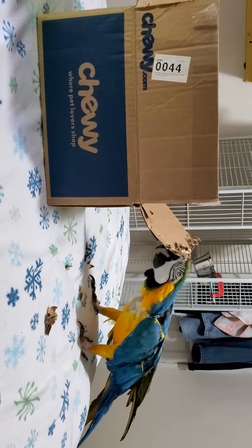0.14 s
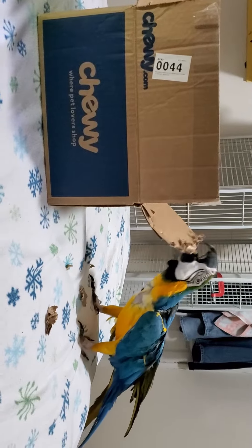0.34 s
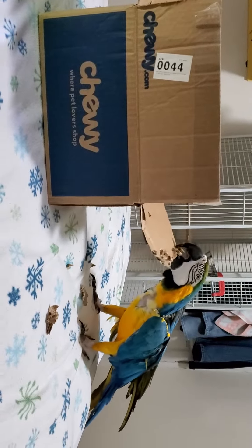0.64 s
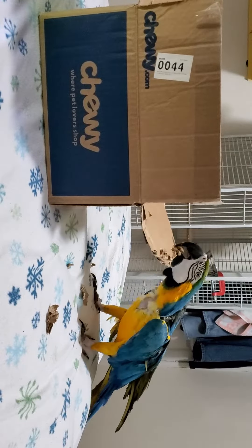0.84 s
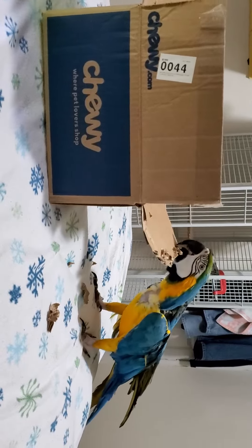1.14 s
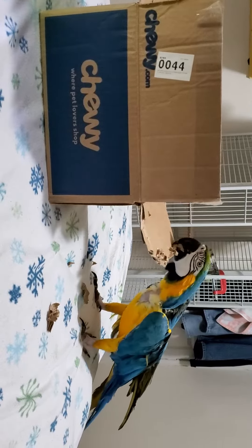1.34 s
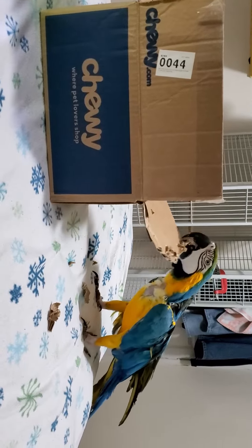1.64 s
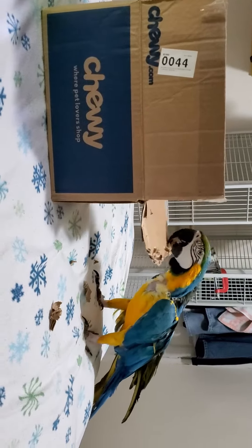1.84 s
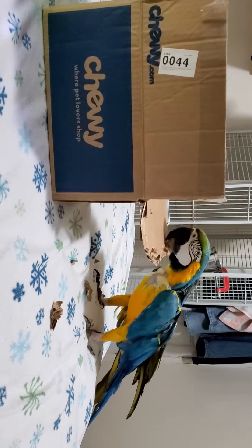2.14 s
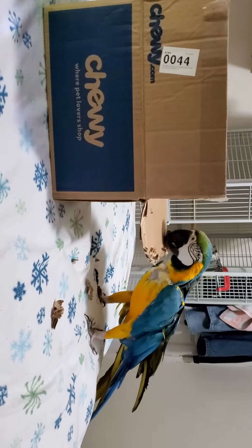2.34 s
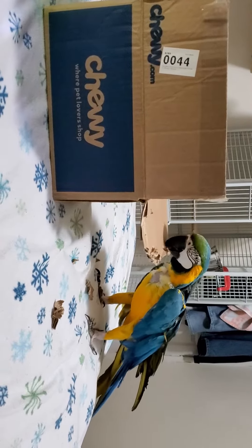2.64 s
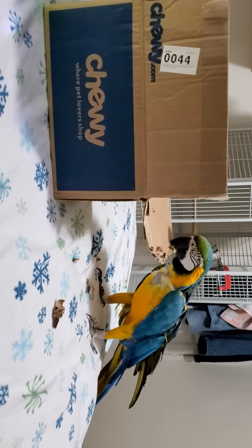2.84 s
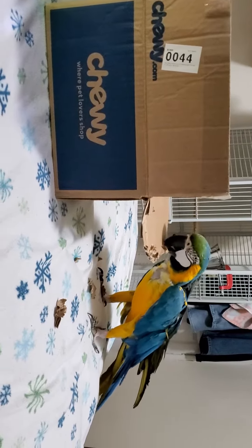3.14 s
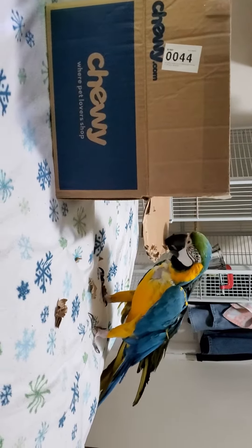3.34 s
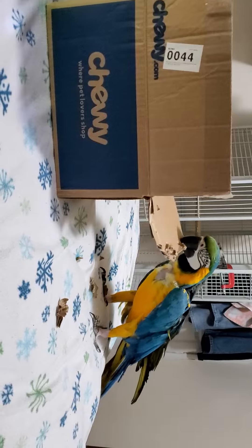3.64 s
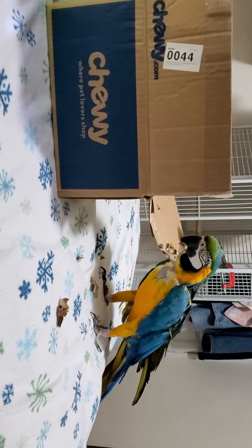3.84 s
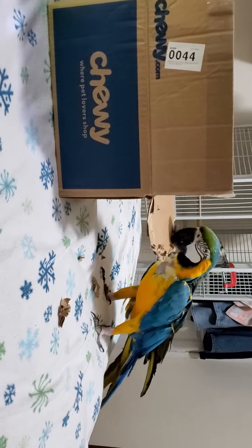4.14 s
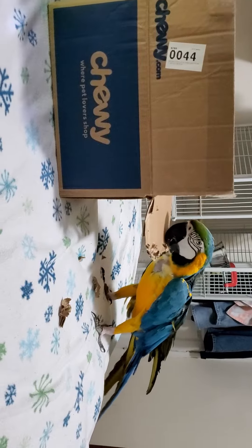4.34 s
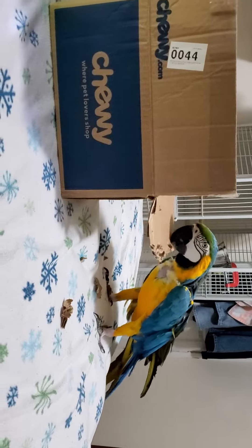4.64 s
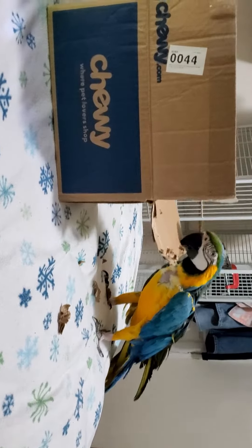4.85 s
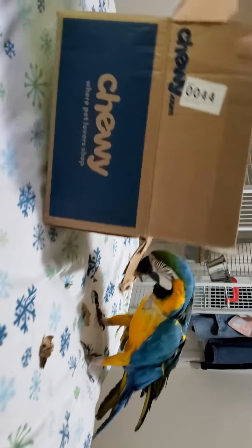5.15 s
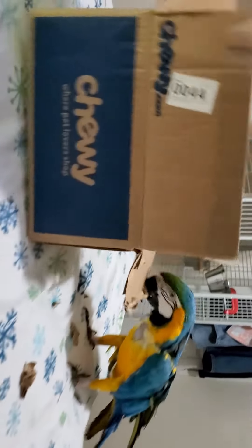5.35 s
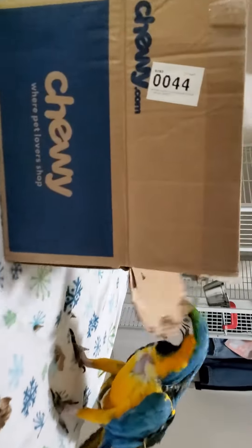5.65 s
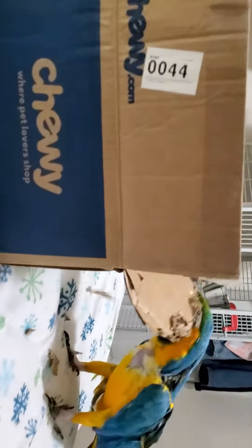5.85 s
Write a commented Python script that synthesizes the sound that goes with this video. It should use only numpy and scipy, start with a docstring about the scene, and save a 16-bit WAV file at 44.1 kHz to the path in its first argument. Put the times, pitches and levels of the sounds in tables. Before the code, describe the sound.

A quiet bedroom with a steady, low fan-like hum and soft airy rumble, picked up in stereo by a phone a metre or two from a large parrot chewing cardboard. At 0.2-0.3 s small tugs knock the hollow box, followed by faint nibbling and a knock at 0.7. A sharp, bright snap and rip lands at 1.05; fizzy, crackling tears run from 1.2 to 1.6, then a duller knock at 1.8. Around 2.0-2.15 a strong rip comes with loud boxy knocks and snaps. From 2.3 to 4.9 the chewing is lighter: scratchy scrapes, small crackles, knocks near 2.7 and 3.1, clicks at 3.6 and 4.4. At 5.05 the hardest tug thumps the box, with dense tearing and snaps until about 5.3. A very faint, wavering metallic ring lingers under the last small crackles until about 6 s. The room's tail is short and soft.

```python
"""A large parrot chews a cardboard flap a metre or two from a phone in a quiet bedroom.
A fan-like hum and air noise fill the soft room throughout: a wavering low tone and bands of noise.
Tugs soon knock the hollow box, ringing its modes; fibres then part in crackle, a dense stream of tiny
noise puffs swelling with each rip, and single fibres snap as very short noise bursts.
Near the end a jolt sets a thin metal ring going, a wavering sine that lingers."""
import sys
import numpy as np
from scipy import signal
from scipy.fft import rfft, irfft, next_fast_len
from scipy.io import wavfile
from scipy.ndimage import uniform_filter1d, map_coordinates

SR = 44100
rng = np.random.default_rng(int(sys.argv[2]) if len(sys.argv) > 2 else 0)


def to_wav(s):
    """Save 16-bit WAV."""
    ch = np.atleast_2d(s).T  # columns
    pcm = np.round(np.clip(ch, -1, 1) * 32767)  # PCM
    wavfile.write(sys.argv[1], SR, pcm.astype(np.int16))


N = 264688


def undb(db):
    """Decibels to an amplitude factor."""
    return 10 ** (np.asarray(db) / 20)


def level(x, db):
    """Scale a sound to an RMS level in dB."""
    return x * undb(db) / np.sqrt(np.mean(x ** 2))


def along(table, size):
    """Read a (frequency [Hz], value) table at every bin of a transform, on a log frequency axis."""
    hz, value = np.transpose(table)
    bins = np.fft.rfftfreq(size, 1 / SR)
    return np.interp(np.log(bins + 1), np.log(hz), value)


def colour(x, table):
    """Filter a sound by a (frequency [Hz], gain [dB]) curve without shifting phase."""
    size = next_fast_len(x.shape[-1])
    shaped = irfft(rfft(x, size) * undb(along(table, size)), size)
    return shaped[..., :x.shape[-1]]


def ports(a, b):
    """Two unrelated signals become the left and right microphone ports in a diffuse field."""
    # how alike the two ports hear the room: (frequency [Hz], left-right correlation)
    likeness = [(60, 0.98), (130, 0.93), (290, 0.49), (640, -0.5), (1410, -0.45), (3100, 0.17),
                (6820, -0.27), (15000, -0.31)]
    size = next_fast_len(len(a))
    correlation = np.clip(along(likeness, size), -.99, .995)
    mid = irfft(rfft(a, size) * np.sqrt((1 + correlation) / 2), size)
    side = irfft(rfft(b, size) * np.sqrt((1 - correlation) / 2), size)
    return np.array([mid + side, mid - side])[:, :len(a)]


def walk(rate):
    """Random levels, rate per second, smoothed by two moving averages; spread near 1."""
    hold = int(SR / rate)
    steps = np.repeat(rng.standard_normal(N // hold + 1), hold)
    smooth = uniform_filter1d(uniform_filter1d(steps, hold), hold)
    return 1.58 * smooth[:N]


def add(track, s, sound):
    """Mix a sound into a track at a time in seconds."""
    i = int(s * SR)
    track[..., i:i + sound.shape[-1]] += sound[..., :N - i]


def tearing():
    """One stream of fibre breaks is heard as hiss, fizz, scrape and through the flap's body."""
    # spectra of the four layers: (frequency [Hz], relative level per Hz [dB])
    hiss_shape = [(3000, -7.5), (4200, -1.5), (5200, 0), (6600, 3.5), (8500, 0), (11000, -22)]
    fizz_shape = [(8000, -34), (10000, -11), (12500, -3), (14500, -6.5), (16500, -2)]
    scrape_shape = [(1500, -5), (2100, -4.5), (2500, -7.5), (3000, -1.5), (3500, -7), (4600, -23)]
    body_shape = [(350, -3), (600, -7.5), (850, -3), (1050, -0.5), (1280, -3), (1450, -1), (1700, -18),
                  (2100, -33)]
    body_db, body_rest_db = -5, -69.5  # body re scrape; its murmur between bites
    hiss_gain, fizz_gain, scrape_gain = rips()
    body_gain = np.hypot(scrape_gain * undb(body_db), undb(body_rest_db))

    fibres = patchiness(ports(*crackle()))
    layers = level(colour(fibres, hiss_shape), 0) * hiss_gain
    layers += level(colour(fibres, fizz_shape), 0) * fizz_gain
    # scrape and body each flutter on their own, then all four together
    layers += level(colour(fibres, scrape_shape), 0) * scrape_gain * undb(1.5 * walk(60))
    layers += level(colour(fibres, body_shape), 0) * body_gain * undb(1.6 * walk(55))
    return undb(1.4 * walk(50)) * layers


def rips():
    """Every rip swells, holds and dies by one rule; overlapping rips add up as power."""
    # bites and rips: (full strength at [s], swell before [ms], hold [ms], hiss level [dB],
    # fizz re hiss [dB], scrape of the flap re hiss [dB])
    bites = [(.405, 8, 58, -67.5, 0, -9), (.545, 8, 30, -74, -6, -7), (.7, 23, 10, -65, -15, 0.5),
             (.9, 53, 103, -77.5, -9, 7.5), (1.047, 8.3, 6.6, -45.5, -6, -2.5),
             (1.22, 69, 8.4, -57, 6.5, -5.5), (1.3, 24, 12, -59, 11.5, 4.5), (1.39, 60, 22, -53.5, 7.5, -5),
             (1.469, 45, 56, -54, 6.5, -2), (1.558, 55, 28, -52, 7, -7), (1.74, 65, 8.1, -62.5, 2.5, -1),
             (1.81, 30, 52, -69.5, -4, 4.5), (1.93, 9.5, 6.9, -73, 0, -2), (1.975, 4.6, 15, -58, -8, -21),
             (2.069, 50, 36, -47, 0.5, -4), (2.152, 6, 4, -52, -7, -15), (2.3, 50, 30, -64, 2, -10),
             (2.45, 25, 18, -66, 0, 6), (2.539, 30, 12, -65.5, -3, 5.5), (2.65, 57, 29, -68.5, 3, 0),
             (2.739, 81, 51, -60, 7, 5.5), (2.868, 30, 85, -68.5, -2, 5.5), (3.071, 36, 78, -61.5, -4, 6),
             (3.312, 51, 54, -67, -18, 10.5), (3.42, 76, 180, -70.5, -9, 5.5),
             (3.61, 10, 18, -59.5, -8, -6), (3.7, 73, 29, -58, 6, 3), (3.84, 60, 23, -68.5, 3, -5),
             (4.04, 29, 42, -62, -7, 3), (4.14, 47, 16, -69, -6, 2.5), (4.249, 45, 8.5, -70, -3, 2.5),
             (4.31, 10, 93, -68, 4, 4), (4.44, 7.5, 17, -59, -2, 5), (4.64, 72, 18, -68, 0, 3),
             (4.72, 47, 114, -71.5, -13, 7), (4.931, 34, 95, -58.5, 9.5, -1.5), (5.054, 17, 42, -52, 3, 6),
             (5.17, 45, 106, -50, -2, -14), (5.252, 23, 71, -55, -13, 8), (5.43, 23, 110, -66, -6, -1),
             (5.609, 59, 23, -65, -1, -3.5), (5.73, 26, 6.6, -62, -6, 3.5), (5.8, 20, 200, -77, -2, 2.5)]
    swell_db, release_db_per_s = 12.5, 256  # gain over the swell; one rate of dying for all
    t = np.arange(N) / SR
    power = np.zeros((3, N))
    for s, swell_ms, hold_ms, hiss_db, fizz_db, scrape_db in bites:
        early = 1000 * (s - t) / swell_ms  # in swell lengths
        late = t - s - hold_ms / 1000
        slope_db = swell_db * np.maximum(early, 0) + release_db_per_s * np.maximum(late, 0)
        shape = undb(hiss_db - slope_db)
        power += (shape * undb([[0], [fizz_db], [scrape_db]])) ** 2
    return np.sqrt(power)


def crackle(rate=900., scatter_db=4.5, smear_s=.001, bed_db=4.0):
    """Tiny fibre breaks of uneven size, each a short noise puff over a steady bed."""
    struck = rng.random(N) < rate / SR  # rate is in breaks per second
    size_db = np.minimum(scatter_db * rng.exponential(size=N), 18.)
    puffs = signal.lfilter([1], [1, -np.exp(-1 / (smear_s * SR))], struck * undb(size_db))
    return (level(puffs, 0) + undb(bed_db)) * rng.standard_normal((2, N))


def patchiness(x, depth_db=3.5, hold_frames=3.0, hold_bins=1.5):
    """Random level patches, smooth over time and frequency, make the rustle's colour uneven and shifting."""
    z = signal.stft(x, nperseg=512)[2]
    grid = rng.standard_normal((260, 1100))
    rows, cols = np.meshgrid(np.arange(z.shape[1]) / hold_bins, np.arange(z.shape[2]) / hold_frames,
                             indexing="ij")
    gain_db = depth_db * map_coordinates(grid, [rows, cols], order=1)
    return signal.istft(z * undb(gain_db), nperseg=512)[1][:, :N]


def knocks(scatter_db=3.5, detune=0.027, strike=2.84, thud_top_hz=480., push_s=0.0014):
    """A ragged tug rings the box modes; where the beak pulls decides which modes speak."""
    # tugs on the box, before the room: (time [s], peak of the upper modes [dB], brightest frequency [Hz],
    # hollow thud re that peak [dB])
    tugs = [(0.216, -54, 1140, -18), (0.301, -32, 1620, -41), (0.325, -50, 1440, -32),
            (0.702, -44.5, 1390, 5.5), (1.045, -32, 2800, -5), (1.22, -41.5, 850, -6),
            (1.303, -42, 1180, -5), (1.404, -43, 1250, -19), (1.466, -34.5, 1580, -14.5),
            (1.506, -43, 3330, -14), (1.542, -38.5, 2760, -11.5), (1.806, -34.5, 1190, 1),
            (1.974, -46.5, 861, -7), (2.077, -29.5, 2960, -28), (2.088, -24.5, 1350, -15),
            (2.117, -40, 1340, -8), (2.733, -44.5, 930, 1.5), (3.058, -44.5, 2940, -6.5),
            (3.137, -37.5, 950, -8.5), (4.442, -38.5, 3150, -3), (5.051, -22, 1900, -12.5),
            (5.095, -31.5, 730, -6.5), (5.25, -41.5, 3360, -1), (5.283, -32, 2220, -18)]
    # box modes: (nominal frequency [Hz], relative level [dB], 60 dB decay time before limits [s])
    modes = [(199, -6, 0.21), (310, 3, 0.03), (337, 7, 0.084), (379, 12.5, 0.054), (385, -32, 0.15),
             (634, -13, 0.15), (706, -5.5, 0.0085), (847, -2.5, 0.1), (1002, -23, 0.15), (1217, -3, 0.062),
             (1346, -1, 0.046), (1580, -7.5, 0.11), (1775, -8.5, 0.035), (2227, -15, 0.22),
             (2390, -3, 0.12), (2574, 1.5, 0.018), (2930, 5, 0.05), (3090, 2, 0.033), (3280, -2.5, 0.22),
             (4030, -11.5, 0.0093)]
    tug_ms = 13.6  # time constant of the drag
    below_db_per_octave, above_db_per_octave = 9, 17  # fall-off around the brightest frequency
    thud_lag_s, thud_bloom_s = .006, .008

    out, t = np.zeros((2, N)), np.arange(4096) / SR
    mode_hz, mode_db, t60 = np.transpose(modes)
    low = mode_hz < thud_top_hz
    push = np.hanning(int(push_s * SR))  # the wall shoves the enclosed air once, smoothly
    t60 = np.clip(t60, np.where(low, .055, .01), np.where(low, .075, .04))
    fade = np.exp(-np.log(1000) * t / t60[:, None])
    chance = rng.standard_normal((len(tugs), 3 + 3000 // len(modes), len(modes)))
    for (s, db, bright_hz, thud_db), draw in zip(tugs, chance):
        hz = mode_hz * (1 + detune * draw[2])  # the loose box sits differently at every tug
        octaves = np.log2(hz / bright_hz)
        tilt_db = np.maximum(above_db_per_octave * octaves, -below_db_per_octave * octaves)
        gain = undb(mode_db - tilt_db * ~low + scatter_db * draw[0])
        tug = draw[3:].ravel()
        tug = tug * np.exp(-1000 * t[:tug.size] / tug_ms)
        tug[:40] *= strike  # the first grip is the hardest
        for port in range(2):
            # the two ports see the low modes alike and the high ones from different sides
            turn = port * draw[1] * np.minimum(hz / 1180.0, 2)
            rings = gain[:, None] * fade * np.sin(2 * np.pi * hz[:, None] * t + turn[:, None])
            upper = signal.fftconvolve(rings[~low].sum(axis=0), tug)
            bloom = 1 - np.exp(-t / thud_bloom_s)
            thud = signal.fftconvolve(rings[low].sum(axis=0) * bloom, push)
            add(out[port], s, undb(db) * upper / abs(upper).max())
            # the air in the box takes a moment to answer
            add(out[port], s + thud_lag_s, undb(db + thud_db) * thud / abs(thud).max())
    return out


def snaps(decay_s=.0004, onset_s=.0016, alike=.7):
    """Each parting fibre is a very short noise burst, peaked at its centre with a broad crack around it."""
    # single fibres, before the room: (time [s], peak before panning [dB], centre frequency [Hz],
    # left minus right [dB])
    fibres = [(0.4043, -45, 6940, -3), (0.702, -40.5, 5140, -18), (1.0426, -30, 4620, 4),
              (1.0485, -20.5, 5370, -4), (1.301, -34.5, 11900, -2), (1.3934, -41, 8440, 1.0),
              (1.465, -32, 11000, 4), (1.9727, -32.5, 6000, 1.0), (2.15, -27, 10900, 7),
              (2.2851, -47, 12200, 9), (2.6478, -43, 11600, -3), (2.7326, -36, 7150, 1),
              (2.8685, -39.5, 6590, 8), (3.1365, -52, 6570, 5), (3.6064, -33, 5840, 0),
              (4.4415, -36.5, 3640, 17), (5.164, -29, 6500, -5), (5.1805, -26, 6300, -4),
              (5.2088, -28, 3730, -14), (5.2409, -36, 6800, -16), (5.252, -27, 6270, -6),
              (5.3228, -32.5, 10700, -14), (5.5409, -39.5, 6860, -21), (5.7225, -42.5, 4000, -14)]
    out, t = np.zeros((2, N)), np.arange(512) / SR
    chance = rng.standard_normal((len(fibres), 3, 512))
    # the onset waits so that the phase-free filter can spread ahead of it
    shape = np.where(t < onset_s, 0, np.exp(-(t - onset_s) / decay_s))
    for (s, db, hz, pan_db), noise in zip(fibres, chance):
        burst = (alike * noise[0] + (1 - alike) * noise[1:]) * shape
        tone = colour(burst, [(1300, -40), (2700, -7), (hz * .7, -7), (hz, 0), (hz * 1.4, -7)])
        sides_db = db + np.array([[pan_db], [-pan_db]]) / 2
        add(out, s, tone / np.abs(tone).max() * undb(sides_db))
    return out


def ring(start_s=5.1, ring_hz=830, ring_db=-66, t60_s=12.0):
    """A thin metallic tone swells after the jolt and lingers, wavering in pitch and strength."""
    t = np.maximum(np.arange(N) / SR - start_s, 0)
    swell = 1 - np.exp(-t / .03)
    decay = np.exp(-np.log(1000) * t / t60_s)
    strength = undb(ring_db + 2.5 * walk(20))
    turns = np.cumsum(ring_hz + 5.0 * walk(15)) / SR
    port_phase = np.array([[0], [1.5]])  # radians
    return np.sqrt(2) * swell * decay * strength * np.sin(2 * np.pi * turns + port_phase)


def room(x, t60_s=.22, tail_db=1.5):
    """Bedding and walls return a short diffuse tail whose treble dies first."""
    t = np.arange(int(.4 * SR)) / SR
    low = ports(*rng.standard_normal((2, len(t))))
    high = ports(*rng.standard_normal((2, len(t))))
    tail = colour(low, [(2000, -1.5), (6000, -21)]) * np.exp(-np.log(1000) * t / t60_s)
    tail += colour(high, [(2000, -22), (6000, 2.5)]) * np.exp(-np.log(1000) * t / (0.64 * t60_s))
    tail *= t > .002  # nothing returns in the first 2 ms
    tail *= undb(tail_db) / np.sqrt(np.sum(tail ** 2) / 2)
    source = x.mean(axis=0)[None]
    return x + signal.fftconvolve(source, tail, axes=1)[:, :N]


def air(air_db=-48):
    """Broad air noise drifts slowly in level, with bands of noise and a low shaft tone on top."""
    # air noise of the room: (frequency [Hz], relative level per Hz [dB])
    air_shape = [(24, -38), (40, -1), (63, -5), (155, -17.5), (320, -17.5), (455, -26), (585, -24.5),
                 (990, -31.5), (1240, -42), (1410, -38.5), (1850, -41), (3740, -60), (9220, -69),
                 (11600, -62), (16000, -64)]
    # fan-like hums: (centre frequency [Hz], bandwidth or, for the first, pitch waver [Hz], level [dB])
    hums = [(35.65, 0.13, -50), (56.5, 27.5, -52), (203.1, 20, -61), (388.5, 48, -63.5),
            (1235.6, 43, -68.5)]
    noise = ports(*rng.standard_normal((2, N)))
    out = level(colour(noise, air_shape), air_db) * undb(.9 * walk(3))
    bins = np.fft.rfftfreq(N, 1 / SR)
    for hz, width_hz, db in hums[1:]:
        resonance = 1 / (1 + (2 * (bins - hz) / width_hz) ** 2)
        band = irfft(rfft(ports(*rng.standard_normal((2, N)))) * resonance, N)
        out = out + level(band, db)
    # the lowest hum is a steady shaft tone that wavers slightly
    hz, waver_hz, db = hums[0]
    turns = np.cumsum(hz + waver_hz * walk(1.19)) / SR
    return out + np.sqrt(2) * undb(db + 0.17 * walk(4.9)) * np.sin(2 * np.pi * turns)


def scene():
    """Tearing, box and fibres close by, the ring, and the air of the bedroom behind them."""
    return tearing() + room(knocks() + snaps()) + ring() + air()


def record(dry):
    """The two ports of the phone hear the treble unequally; a steep low-pass cuts the top."""
    # treble balance of the ports: (frequency [Hz], left minus right [dB])
    treble_lean = [(2000, 0), (6000, -1), (9000, 2.5), (14000, 2)]
    top_hz = 15900
    hz, lean_db = np.transpose(treble_lean)
    left = colour(dry[0], np.c_[hz, lean_db / 2])
    right = colour(dry[1], np.c_[hz, -lean_db / 2])
    low_pass = signal.ellip(10, .2, 75, top_hz, fs=SR, output="sos")
    return signal.sosfilt(low_pass, [left, right])


dry = scene()
out = record(dry)
to_wav(out)
```